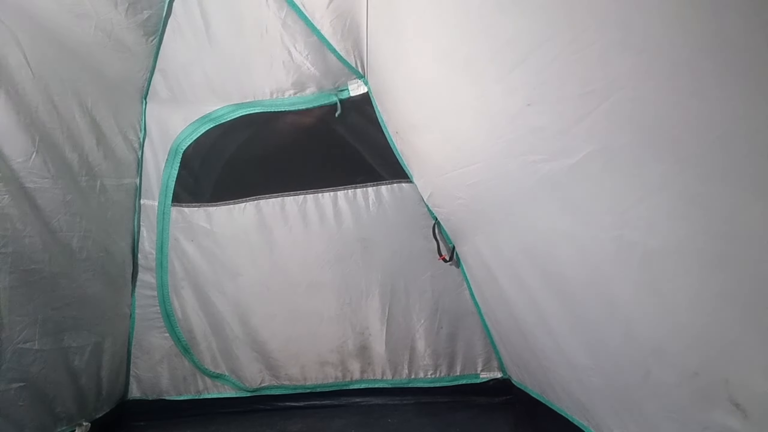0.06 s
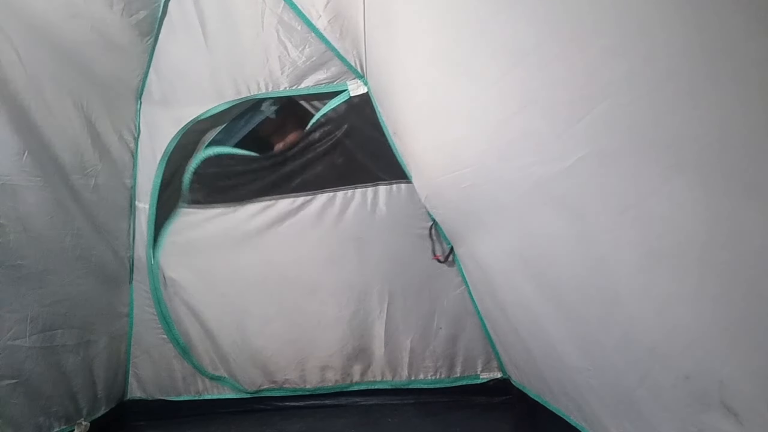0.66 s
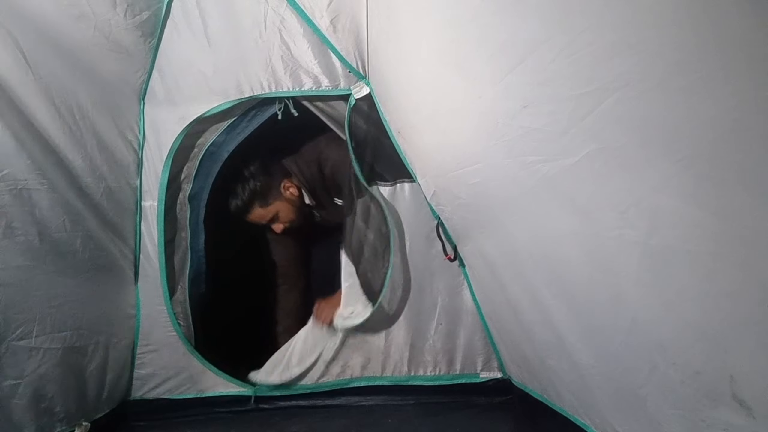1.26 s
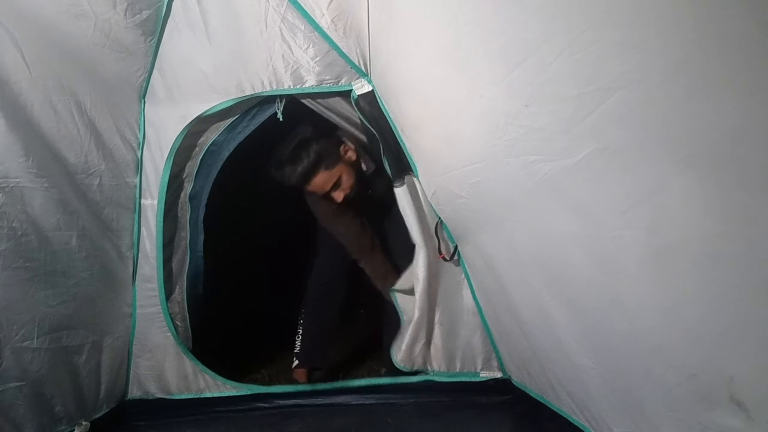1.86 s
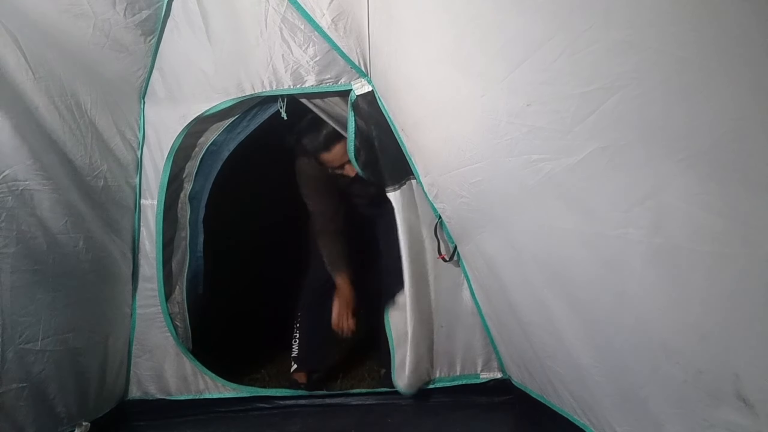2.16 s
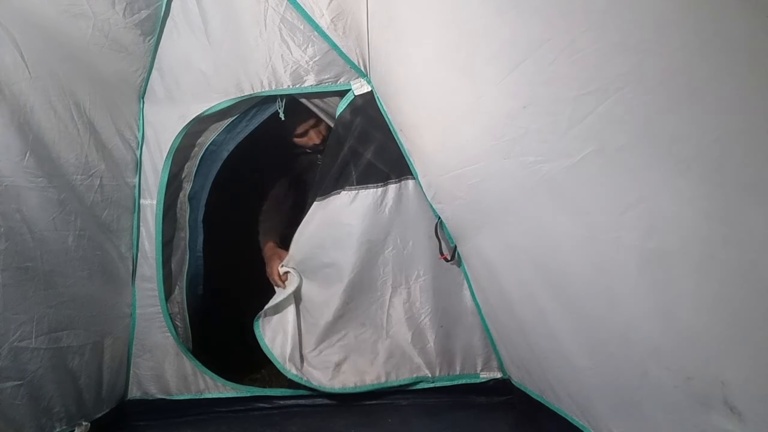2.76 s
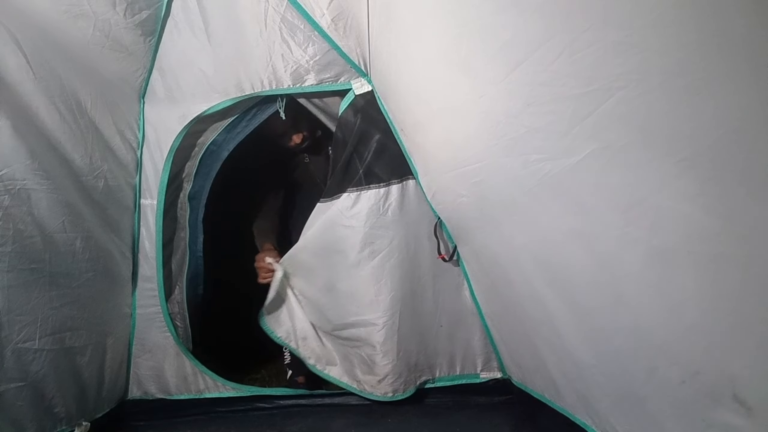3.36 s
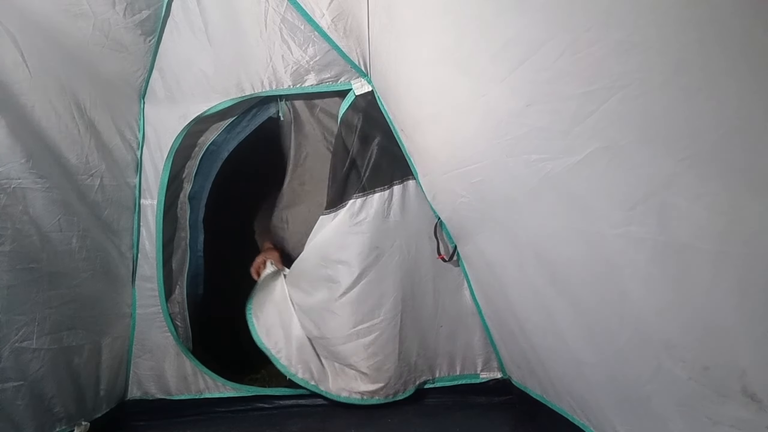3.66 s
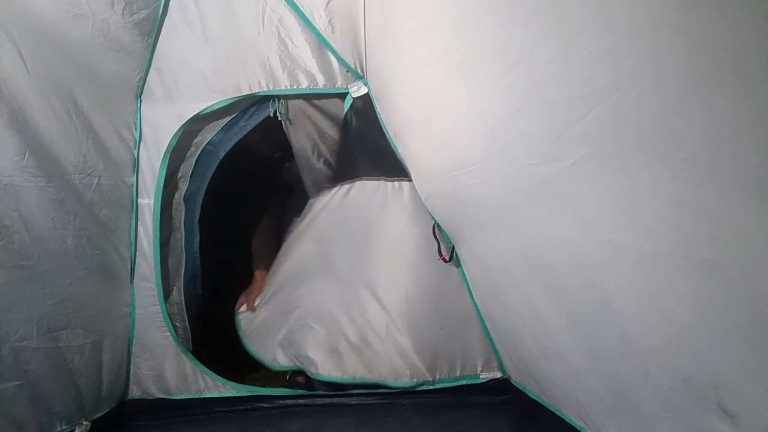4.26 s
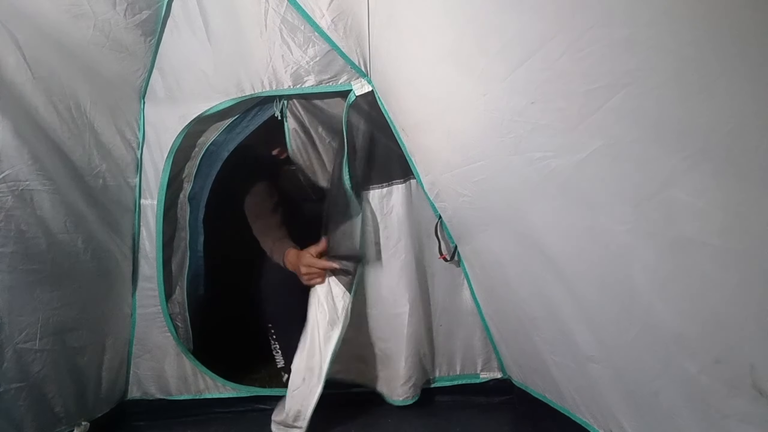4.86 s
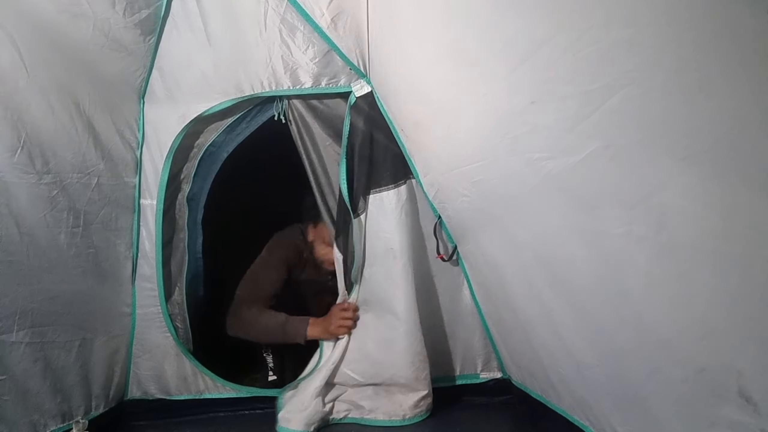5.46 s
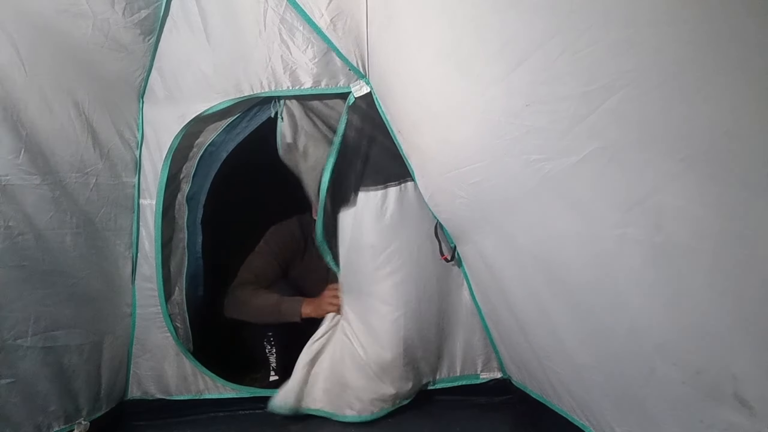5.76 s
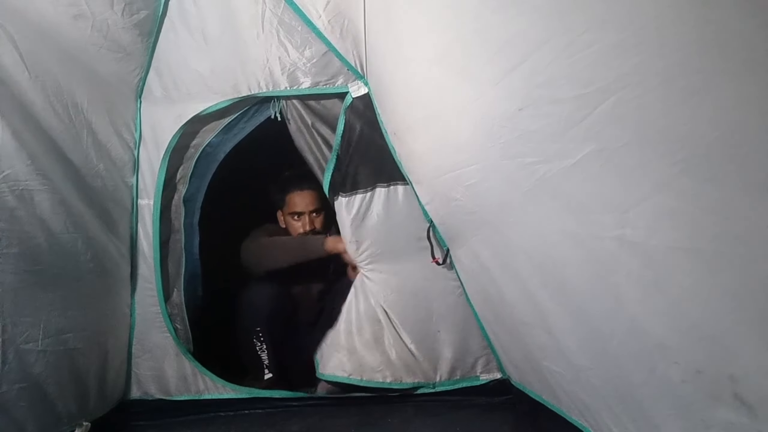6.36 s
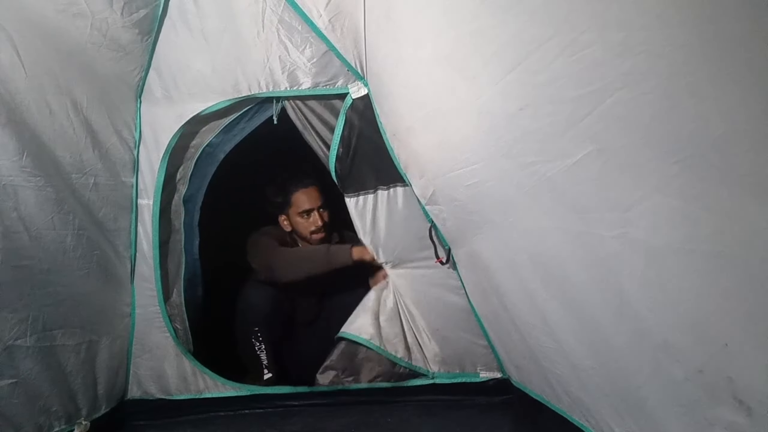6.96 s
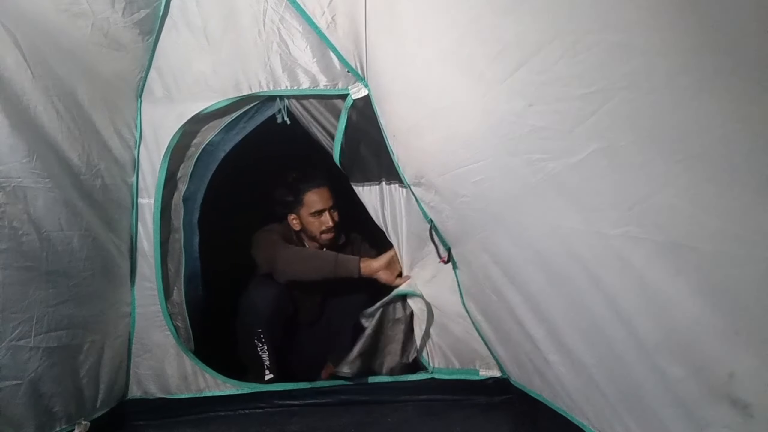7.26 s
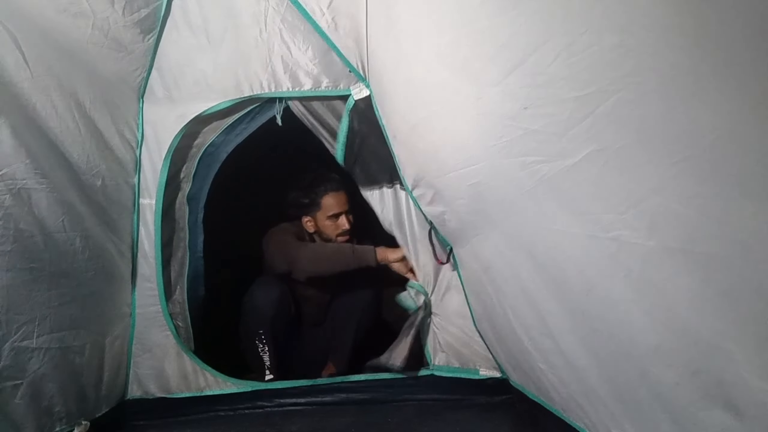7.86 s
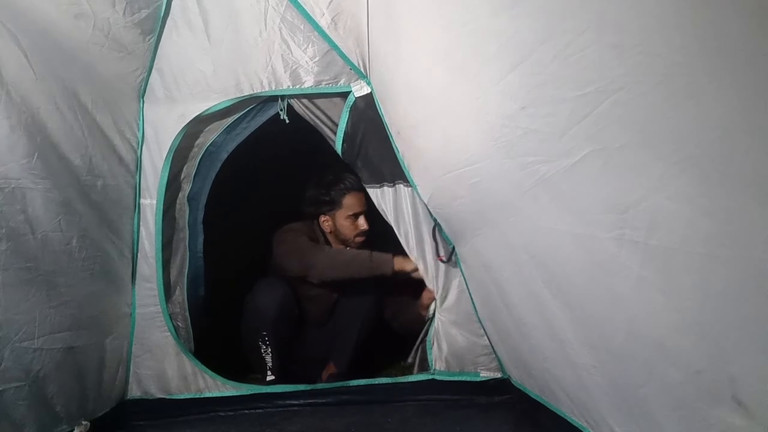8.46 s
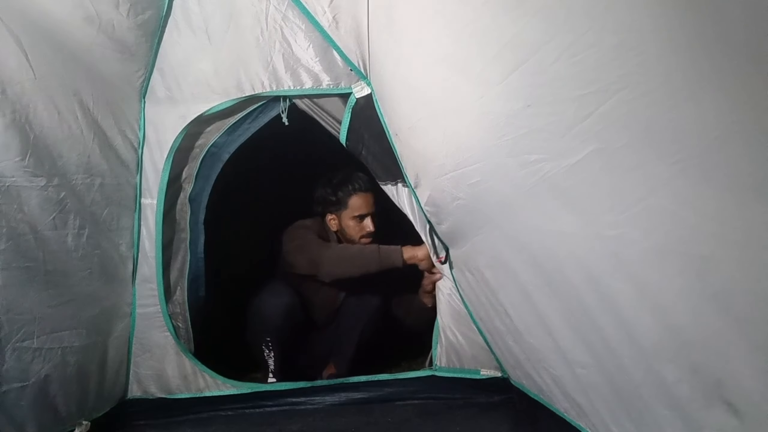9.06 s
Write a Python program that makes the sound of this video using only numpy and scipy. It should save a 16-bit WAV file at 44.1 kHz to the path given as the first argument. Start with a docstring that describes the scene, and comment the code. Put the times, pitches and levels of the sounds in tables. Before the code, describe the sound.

Heard from close by inside a tent at night, a zipper slides open in three short, buzzing runs. Thin nylon then rustles in irregular strokes as the door flap is pulled back and rolled up, its creases cracking taut and the slack cloth flapping with dull thumps that lightly buffet the microphone. Insects keep up a thin, faint, very high buzz behind it.

```python
"""A tent door's zipper runs open in three pulls; the nylon flap is then swept aside, shaken and rolled
up, swishing, crinkling and flapping. The slider clicks over the teeth, its speed setting the pitch.
Nylon slides in tiny slips, creases snap taut, slack cloth pushes air. Insects buzz very high in the
night outside. Two small microphone ports hear it all from nearby."""
import sys
import numpy as np
from scipy import signal
from scipy.fft import rfft, irfft, next_fast_len
from scipy.io import wavfile
from scipy.ndimage import uniform_filter1d, map_coordinates

SR = 44100
rng = np.random.default_rng(int(sys.argv[2]) if len(sys.argv) > 2 else 0)


def store_pcm(level_fs):
    """Save levels as 16-bit WAV."""
    pcm = np.round(np.clip(level_fs, -1, 1) * 32767).astype(np.int16)
    wavfile.write(sys.argv[1], SR, np.atleast_2d(pcm).T)


N = 401310

# Slider travel, one list per pull. Each row: time in seconds, teeth per second, relative hum in dB.
ZIP_PULLS = [
    [(0.0, 186, -65), (0.07, 235, -44.5), (0.24, 630, -44.5), (0.28, 880, -38.5), (0.335, 890, -21.5),
     (0.362, 980, -13.5), (0.39, 1085, -34.5), (0.44, 660, -37.5), (0.47, 600, -46)],
    [(0.56, 690, -44.5), (0.69, 855, -27.5), (0.74, 786, -51), (0.79, 835, -33.5), (0.85, 670, -53),
     (0.91, 550, -38), (0.995, 750, -63), (1.04, 385, -33.5), (1.09, 330, -39.5), (1.12, 700, -42.5),
     (1.2, 350, -44)],
    [(1.28, 380, -33), (1.39, 900, -51), (1.44, 890, -38.5), (1.55, 797, -35.5), (1.595, 800, -37),
     (1.632, 490, -33.5), (1.65, 615, -46), (1.68, 590, -35.5), (1.75, 160, -48), (1.8, 155, -68)],
]
# Tugs on the slider. Each row: start and length in seconds, then relative levels in dB of rasp,
# tape scrape, tape singing, slider ring and panel drumming.
SLIDER_TUGS = [(0.087, 0.035, -50, -40.5, -38, -53, -43), (0.113, 0.06, -30, -43, -41, -39, -47),
               (0.198, 0.069, -31, -36.5, -42, -43, -45.5), (0.305, 0.093, -29.5, -37.5, -38.5, -31, -48),
               (0.432, 0.13, -30.5, -40, -35.5, -40, -46), (0.598, 0.12, -32, -44, -38, -30.5, -50.5),
               (0.751, 0.087, -33.5, -46.5, -42, -38, -47.5), (0.88, 0.17, -36, -48, -43, -39, -42.5),
               (1.105, 0.067, -34, -42.5, -40, -37.5, -43.5), (1.227, 0.11, -42, -46, -37.5, -61, -46),
               (1.359, 0.12, -28, -40.5, -38.5, -40.5, -54), (1.501, 0.089, -29.5, -40.5, -32, -34.5, -64),
               (1.633, 0.067, -34, -40.5, -35.5, -43, -60)]
# Tape resonance, shifting as the slider rounds the door. Each row: time in seconds, frequency in Hz.
TAPE_RESONANCE_PATH = [(0.2, 2330), (0.38, 2150), (0.5, 1950), (0.68, 2490), (0.8, 1696), (1.15, 1912),
                       (1.45, 1800), (1.7, 1652)]
# Hand strokes on the flap. Each row: start and length in seconds, relative swish level in dB,
# sheen and folds offsets from it in dB.
FLAP_STROKES = [(1.732, 0.13, -53, 1, -7), (1.915, 0.02, -57, -3, 2), (2.103, 0.048, -54.5, 0.5, -5),
                (2.199, 0.01, -57, -5, -12), (2.266, 0.027, -59, -3, -6), (2.355, 0.02, -59, -2, -9),
                (2.441, 0.03, -70, -2, 13.5), (2.55, 0.066, -61.5, -7.5, -7), (2.79, 0.06, -62, -6.5, -2.5),
                (2.999, 0.06, -52, -6, -15), (3.093, 0.073, -46, -1, -10), (3.215, 0.11, -46.5, -3, -3),
                (3.417, 0.068, -45.5, -6.5, -13), (3.533, 0.047, -38.5, -1.5, -3),
                (3.697, 0.074, -57.5, 2.5, 2), (4.119, 0.043, -45, 2, -6), (4.211, 0.088, -49.5, 2, -1.5),
                (4.56, 0.11, -60, -2, 8.5), (4.786, 0.16, -48, -3, -4), (4.985, 0.045, -42.5, -5, -5),
                (5.074, 0.043, -52.5, -4, 2), (5.239, 0.2, -48, -3, -6.5),
                (5.516, 0.099, -51.5, -8.5, -3.5), (5.709, 0.059, -46, -1.5, -2.5),
                (5.852, 0.11, -49.5, -2, -2.5), (6.02, 0.13, -51.5, -9, -1),
                (6.138, 0.11, -48.5, -1.5, -10), (6.393, 0.06, -51, -1.5, -5), (6.50, 0.13, -47.5, -1, -2),
                (6.707, 0.088, -47, 0, -2), (6.97, 0.06, -54, -1, -1), (7.048, 0.074, -47.5, 0.5, -6.5),
                (7.169, 0.056, -47.5, -1.5, 2), (7.32, 0.045, -46, -1, -3.5), (7.42, 0.42, -53, -0.5, -2.5),
                (7.754, 0.12, -46, -1.5, -1), (7.93, 0.093, -52.5, -3, 1), (8.05, 0.08, -48.5, 0.5, -5.5),
                (8.26, 0.076, -55.5, -9, -1.5), (8.383, 0.15, -50, -1.5, -2), (8.586, 0.26, -48.5, -4, 0.5),
                (8.82, 0.11, -48, 0.5, -1.5), (9.062, 0.063, -47.5, -26, -6.5)]
# The held flap never hangs still. Each row: time in seconds, relative swish level in dB.
FLAP_STIR = [(1.7, -60), (2.9, -68.5), (3.2, -55.5), (4.0, -58), (4.4, -61), (4.7, -55.5), (5.17, -60.5),
             (6.3, -54), (9.0, -58.5)]
# Creases snapping taut. Each row: start in seconds, relative level in dB, pitch in Hz.
CREASE_SNAPS = [(0.042, -39, 2190), (0.216, -20, 2300), (1.179, -23, 1460), (1.985, -24.5, 4070),
                (2.122, -36.5, 800), (2.261, -36, 763), (2.349, -36.5, 2530), (3.09, -29, 2400),
                (3.246, -26, 2160), (3.409, -27, 2410), (3.451, -29.5, 730), (3.538, -14.5, 3530),
                (3.552, -17, 3800), (3.562, -19, 2010), (3.787, -32, 1880), (4.142, -35, 2570),
                (4.444, -33, 2340), (4.608, -32, 2050), (4.993, -38, 2080), (5.734, -31, 767),
                (5.852, -33, 1670), (6.141, -18, 2050), (6.405, -29, 2220), (6.512, -44, 2440),
                (6.613, -27, 6330), (6.703, -30.5, 1710), (8.604, -30, 789), (8.887, -29, 2160)]
# Slack cloth pushing air. Each row: start in seconds, level in dB, pitch in Hz, puff offset in dB.
SLACK_FLAPS = [(1.988, -33, 172, 1.5), (3.518, -21.5, 175, -2), (3.553, -26, 150, -15),
               (4.108, -28.5, 137, -16), (4.138, -30, 151, -19), (4.229, -32, 70, -19),
               (4.986, -39, 124, -16), (5.734, -28.5, 210, -7), (6.058, -36, 153, -9),
               (7.22, -28.5, 157, -17), (7.294, -30.5, 83, -4), (7.498, -32.5, 62, -4), (7.79, -29, 145, 0),
               (7.848, -31, 89, 0.5), (7.928, -29.5, 83.4, -8), (8.108, -23.5, 122, -8.5),
               (8.626, -31, 116, -0.5), (8.753, -37, 108, 1), (9.012, -29.5, 75, -9)]
# Sweeps fanning the ports. Each row: start and length in seconds, relative level in dB.
DRAUGHT_SWEEPS = [(3.53, 0.054, -53), (4.226, 0.11, -53), (4.97, 0.031, -65), (7.228, 0.33, -49.5),
                  (7.76, 0.21, -49.5), (8.09, 0.042, -52), (8.58, 0.22, -55), (9.008, 0.04, -48.5)]

# Spectra. Each row: frequency in Hz, relative spectral density in dB.
RASP_SPECTRUM = [(600, -6.5), (1000, -1.5), (1250, -14), (1600, -22.5), (2200, -11), (2900, -0.5),
                 (3700, -1.5), (5200, -2), (6600, -8), (7800, -7), (9400, -4), (11000, -6.5), (15000, -7.5)]  # teeth scraping
SLIDER_SPECTRUM = [(3800, -53), (5100, -7), (5800, -2.5), (6500, 3), (7100, -12.5), (8300, -25)]  # metal slider ringing
TAPE_SPECTRUM = [(1000, -23), (1350, -8), (1620, 1.5), (1800, 0.5), (2050, 1.5), (2400, 2.5), (2700, -4),
                 (3400, -11), (4500, -27)]  # stiff zipper tape
PANEL_SPECTRUM = [(25, -24), (60, 1), (135, 10), (200, 4), (280, -9), (340, -7), (700, -3.5), (1100, -12),
                  (2000, -16.5)]  # door panel drumming
SWISH_SPECTRUM = [(500, -21.5), (900, -6.5), (1200, -9), (1700, -4.5), (2250, -0.5), (2900, -4),
                  (3700, -5.5), (4800, -10.5), (7000, -18)]  # nylon on nylon
SHEEN_SPECTRUM = [(2500, -21), (4000, -3.5), (5400, -1), (6500, 1.5), (7800, -10.5), (9500, -7),
                  (11500, -8.5), (14400, -1.5), (16000, -10)]  # its fine weave
FOLDS_SPECTRUM = [(120, -10), (230, 1.5), (380, 1), (520, -1.5), (780, 0), (1100, -13.5), (1700, -21.5)]  # large folds crumpling
BILLOW_SPECTRUM = [(18, -37), (45, -10.5), (85, -7), (150, 1), (210, -4), (350, -17.5), (700, -43)]  # whole sheet moving
CREASE_SPECTRUM = [(150, -18), (400, -4), (800, 2.5), (1200, -8.5), (2200, -4), (4000, -4), (6500, -6),
                   (9000, -21), (16000, -13)]  # crease cracking
GUST_SPECTRUM = [(15, -13), (35, -10), (65, -4.5), (100, -4), (200, -38)]  # air buffeting the ports
WING_SPECTRUM = [(9500, -67), (11000, -7), (12200, 1), (13000, 2.5), (14400, 7.5), (15200, 6), (16000, -15)]  # insect wings scraping
NIGHT_SPECTRUM = [(15, -37), (25, 5), (177, -10), (667, -0.5), (1020, -10.5), (3080, 5), (4060, 1),
                  (6530, 0.5), (8180, -14), (10000, -7), (13000, -54), (22000, -120)]  # distant air

# Stereo likeness. Each row: frequency in Hz, left-right correlation.
PORT_CORRELATION = [(60, 0.62), (140, 0.59), (350, 0.89), (700, 0.63), (1400, 0.41), (2500, 0.03),
                    (5000, 0.025)]
# Colour of the ports. Each row: frequency in Hz, left minus right in dB.
PORT_BALANCE = [(60, 10), (130, 7), (350, 2), (1300, -0.5), (1800, 1), (2350, 5.5), (3300, .5),
                (5400, -0.5), (6500, -9), (7300, -0.5), (8100, 4), (9500, 5.5), (10800, -3.5),
                (12500, -2.5), (14600, -16)]


def zipper():
    """The slider crosses the teeth: gliding hum, bright rasp, buzzing tape, metal ring, drumming panel."""
    tooth_hz, hum_db = curves(np.vstack(ZIP_PULLS))
    starts_s, lengths_s, *levels_db = np.transpose(SLIDER_TUGS)
    rasp_gain, tape_gain, sing_gain, ring_gain, panel_gain = [
        swells(starts_s, lengths_s, db, attack_s=.034, release_s=.021) for db in levels_db]
    speed_octaves = np.log2(tooth_hz / 800)  # faster rasps and rings louder
    slowness = np.clip(850 / tooth_hz, .9, 2.5)  # slower catches and stutters
    tooth_hz = np.abs(tooth_hz * (1 + slowness ** 2 * (.017 * wobble(70) + .016 * wobble(400))))
    teeth_passed = np.cumsum(tooth_hz) / SR
    lag_rad = .35 + .33 * wobble(14)  # the moving slider reaches the ports at changing phases
    phase = 2 * np.pi * teeth_passed + np.array([-lag_rad, lag_rad])
    stutter = amp(slowness * (1.3 * wobble(130) + .9 * wobble(45) - .4))
    sliding = np.arange(N) / SR < ZIP_PULLS[-1][-1][0]
    hum = sliding * amp(hum_db + 2) * stutter * np.sin(phase)
    clicks = tooth_clicks(teeth_passed, slop_periods=.036 * slowness ** 2, scatter_db=2, t60_s=.03)
    scrape = noise() * (1 + .5 * np.cos(phase)) * grains(per_s=1000, scatter_db=1.2, life_s=.012)
    bite = .6 * unit(clicks / np.sqrt(tooth_hz)) + .8 * unit(scrape)
    rasp = amp(2 * speed_octaves - 3) * patchy(spread(bite, RASP_SPECTRUM), depth_db=2.5, bins=5)
    ring = amp(3.5 * speed_octaves) * patchy(spread(bite, SLIDER_SPECTRUM), depth_db=4, bins=4)
    sing = tape_overtones(phase, tooth_hz, count=5) / slowness
    rough = patchy(spread(bite, TAPE_SPECTRUM), depth_db=4.5, bins=3)
    tape = sing_gain * sing + tape_gain * rough
    drumming = noise() * grains(per_s=440, scatter_db=3.5, life_s=.0077)
    panel = amp([[4.5], [1.5]]) * spread(drumming, PANEL_SPECTRUM)
    return hum + rasp_gain * rasp + tape + ring_gain * ring + panel_gain * panel


def tooth_clicks(teeth_passed, slop_periods, scatter_db, t60_s):
    """One click per tooth, a little early or late, scattered by the tape around it."""
    k = np.flatnonzero(np.diff(np.floor(teeth_passed)) > 0)
    late, strength = rng.standard_normal((len(k), 2)).T
    delay_periods = np.ceil(teeth_passed[k]) - teeth_passed[k] + slop_periods[k] * late
    at_samples = k + delay_periods / (teeth_passed[k + 1] - teeth_passed[k])
    taps = at_samples.astype(int)[:, None] + np.arange(-7, 9)
    pulses = amp(scatter_db * strength[:, None]) * np.sinc(taps - at_samples[:, None])
    clicks = np.bincount(np.clip(taps, 0, N - 1).ravel(), pulses.ravel(), N)
    t = np.arange(SR // 25) / SR
    tape_response = rng.standard_normal((2, len(t))) * amp(-60 * t / t60_s)
    return signal.fftconvolve(clicks[None], tape_response, axes=1)[:, :N]


def tape_overtones(phase, tooth_hz, count):
    """Multiples of the tooth rate, the higher the rougher, swell as they cross the tape's resonance."""
    resonance_hz, = curves(TAPE_RESONANCE_PATH)
    boost_db, width_octaves, jitter_rad = 8.5, .15, .14
    out, power = 0, 0
    for k in range(2, 2 + count):
        nearness = np.exp(-(np.log2(k * tooth_hz / resonance_hz) / width_octaves) ** 2)
        gain = (1 + amp(boost_db) * nearness) / np.sqrt(k)
        flutter = amp(2.5 * np.array([wobble(60), wobble(60)]))
        tone = np.sin(k * (phase + jitter_rad * wobble(220)) + rng.uniform(0, 2 * np.pi))
        out += gain * flutter * tone
        power += gain ** 2
    return unit(out / np.sqrt(power))


def flap_cloth():
    """With each stroke nylon slides in tiny slips, larger folds crumple and the whole sheet billows."""
    starts_s, lengths_s, swish_db, sheen_db, folds_db = np.transpose(FLAP_STROKES)
    stir_db, = curves(FLAP_STIR)

    def layer_gain(offset_db, stir_offset_db):
        strokes = swells(starts_s, lengths_s, swish_db + offset_db, attack_s=.032, release_s=.034)
        return np.hypot(strokes, amp(stir_db + stir_offset_db))

    swish_gain = layer_gain(0, stir_offset_db=0)
    sheen_gain = layer_gain(sheen_db, stir_offset_db=-3)
    folds_gain = layer_gain(folds_db, stir_offset_db=-2.5)
    crumple = grains(per_s=110, scatter_db=3.6, life_s=.005)
    slips = grains(per_s=600, scatter_db=1, life_s=.0025)
    friction = np.sqrt(amp(-2.5) ** 2 + (amp(-6.5) * slips) ** 2 + (amp(-5.5) * crumple) ** 2)
    swish = patchy(spread(noise() * friction, SWISH_SPECTRUM), depth_db=1.5, bins=5)
    sheen = patchy(spread(noise() * friction, SHEEN_SPECTRUM), depth_db=1.5, bins=7)
    folds = patchy(spread(noise() * (crumple + 2.4), FOLDS_SPECTRUM), depth_db=2, bins=3, frames=6)
    billow = amp(-4) * spread(noise() * amp(2.8 * wobble(30)), BILLOW_SPECTRUM)
    cloth = amp(3.5) * (swish_gain * swish + sheen_gain * sheen) + folds_gain * (folds + billow)
    return amp(.83 * wobble(22)) * cloth  # the hand's speed wavers


def crease_snaps():
    """A crease pulled taut cracks at its own pitch; the cloth around it shivers briefly."""
    out, t = np.zeros((2, N)), np.arange(SR // 6) / SR
    crack_t60_s, shiver_t60_s, tail_t60_s = .016, .045, .1
    decay = amp(-60 * t / crack_t60_s) + amp(-12 - 60 * t / shiver_t60_s) + amp(-26 - 60 * t / tail_t60_s)
    for start_s, db, pitch_hz in CREASE_SNAPS:
        burst = spread(rng.standard_normal((2, len(t))), CREASE_SPECTRUM)
        crack = filtered(burst, lambda hz: 1 + amp(11) * np.exp(-(np.log((hz + 1) / pitch_hz) / .22) ** 2))
        add(out, start_s, amp(db - 7.5) * decay * unit(crack))
    return out


def slack_flaps():
    """Slack cloth stops short: one low push of air with a dull puff."""
    out, t = np.zeros((2, N)), np.arange(SR // 6) / SR
    rise_s, push_t60_s, puff_t60_s = .0024, .048, .034
    rise = 1 - np.exp(-t / rise_s)
    for start_s, db, pitch_hz, puff_db in SLACK_FLAPS:
        push = np.sin(2 * np.pi * pitch_hz * t) * amp(-60 * t / push_t60_s)
        puff = spread(rng.standard_normal((2, len(t))), FOLDS_SPECTRUM) * amp(-60 * t / puff_t60_s)
        add(out, start_s, amp(db) * rise * (push + amp(puff_db) * puff))
    return out


def draught():
    """Air fanned by the flap buffets each port separately, the left one more."""
    gain = swells(*np.transpose(DRAUGHT_SWEEPS), attack_s=.038, release_s=.036)
    buffet = unit(filtered(noise(), lambda hz: amp(along(GUST_SPECTRUM, hz))))
    return gain * buffet * amp([[3], [-1]])


def insects():
    """A near insect scrapes its wings in quick strokes over a blurred chorus."""
    stroke_hz, level_db, drift_db = 88, -48, .2
    phase = 2 * np.pi * np.cumsum(stroke_hz * (1 + .014 * wobble(12))) / SR
    strokes = unit(np.exp(1.5 * np.cos(phase)) * amp(1.3 * wobble(65)))
    call = spread(noise() * np.sqrt(1 + (amp(-5) * strokes) ** 2), WING_SPECTRUM)
    return amp(level_db + drift_db * wobble(5)) * call


def night_air():
    """Faint, steady hiss of distant air."""
    return amp(-58) * spread(noise(), NIGHT_SPECTRUM)


def amp(db):
    """Decibels to gain."""
    return 10 ** (np.asarray(db) / 20)


def unit(x):
    """Scale to rms 1."""
    return x / np.sqrt(np.mean(x ** 2) + 1e-20)


def along(points, hz):
    """(Hz, value) points read on a log axis."""
    knots_hz, values = np.transpose(points)
    return np.interp(np.log(hz + 1), np.log(knots_hz + 1), values)


def curves(rows):
    """One value per sample for each column after the time."""
    times_s, *columns = np.transpose(rows)
    return [np.interp(np.arange(N) / SR, times_s, column) for column in columns]


def noise():
    """Two unrelated white noises."""
    return rng.standard_normal((2, N))


def wobble(knots_per_s):
    """Smooth random curve."""
    knots = rng.standard_normal(int(N * knots_per_s / SR) + 4)
    return map_coordinates(knots, [np.arange(N) * knots_per_s / SR])


def grains(per_s, scatter_db, life_s):
    """Envelope (rms 1) of many tiny slips, each starting at once and dying away."""
    onsets = rng.random(N) < per_s / SR
    power = onsets * amp(scatter_db * np.minimum(rng.exponential(size=N), 4)) ** 2
    decaying = signal.lfilter([1], [1, -np.exp(-2 / (life_s * SR))], power)
    return unit(np.sqrt(np.abs(decaying)))


def swells(starts_s, lengths_s, levels_db, attack_s, release_s):
    """Gain of a series of moves: each rises to its level, holds for its length and dies away."""
    t = np.arange(0, N, 32) / SR
    early = np.maximum(starts_s[:, None] - t, 0) / attack_s
    late = np.maximum(t - (starts_s + lengths_s)[:, None], 0) / release_s
    gains = amp(levels_db[:, None]) * np.exp(-early - late)
    return np.interp(np.arange(N) / SR, t, np.linalg.norm(gains, axis=0))


def filtered(x, response):
    """Apply a gain given as a function of Hz."""
    n = x.shape[-1]
    padded = next_fast_len(n + 8192)
    return irfft(rfft(x, padded) * response(np.fft.rfftfreq(padded, 1 / SR)), padded)[..., :n]


def spread(pair, spectrum):
    """Two unrelated signals become coloured stereo of rms 1, alike in the bass."""
    def mid_side_gains(hz):
        angle = np.arccos(np.clip(along(PORT_CORRELATION, hz), -1, 1)) / 2
        return amp(along(spectrum, hz)) * np.array([np.cos(angle), np.sin(angle)])
    mid, side = filtered(pair, mid_side_gains)
    return unit(np.array([mid + side, mid - side]))


def patchy(x, depth_db, bins, frames=5):
    """Shifting folds favour changing bands: a random gain smoothed over frequency and time."""
    spectra = signal.stft(x, nperseg=512)[2]
    field = rng.standard_normal(spectra.shape[1:])
    for _ in range(2):
        field = uniform_filter1d(uniform_filter1d(field, bins, axis=0), frames, axis=1)
    return unit(signal.istft(spectra * amp(depth_db * unit(field)), nperseg=512)[1][:, :N])


def add(track, start_s, sound):
    """Mix in a short stereo sound."""
    part = track[:, max(round(start_s * SR), 0):][:, :sound.shape[1]]
    part += sound[:, :part.shape[1]]


def scene():
    """The door, the insects and the still night air."""
    air = night_air()
    return zipper() + flap_cloth() + draught() + crease_snaps() + slack_flaps() + insects() + air


def record(dry):
    """Each port has its own colour; nothing passes above the band limit."""
    def ports(hz):
        pair = amp(along(PORT_BALANCE, hz) * np.array([[.5], [-.5]]))
        return pair / np.sqrt(np.mean(pair ** 2, axis=0))
    limit_hz = 15850
    return filtered(filtered(dry, ports), lambda hz: hz < limit_hz)


dry = scene()
out = record(dry)
store_pcm(out)
```